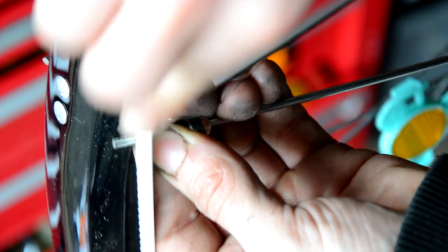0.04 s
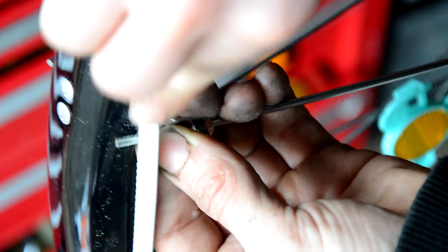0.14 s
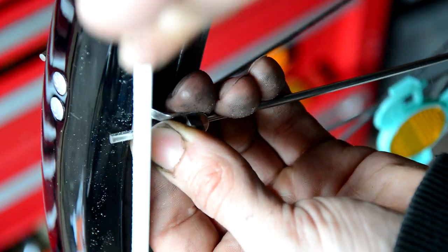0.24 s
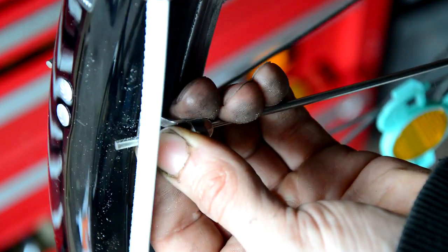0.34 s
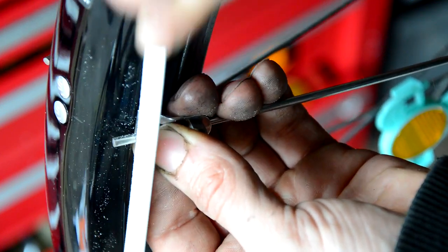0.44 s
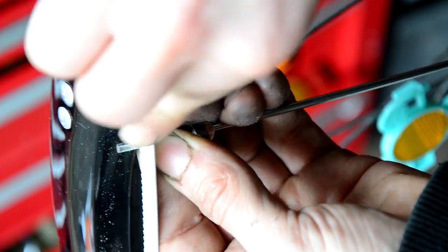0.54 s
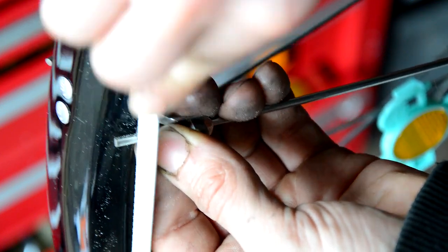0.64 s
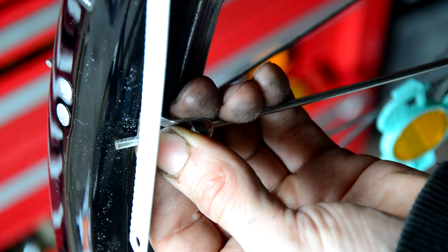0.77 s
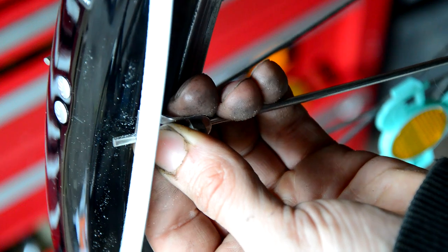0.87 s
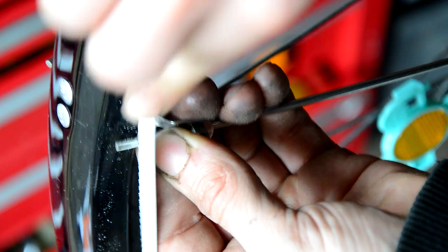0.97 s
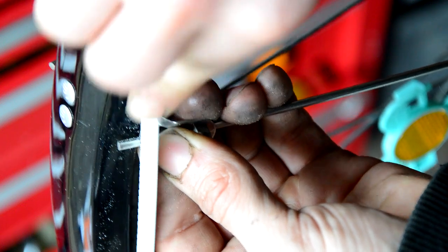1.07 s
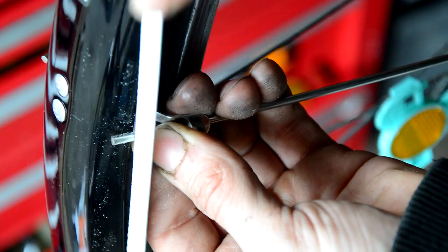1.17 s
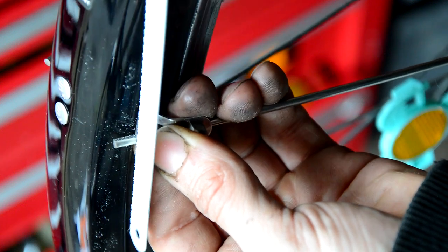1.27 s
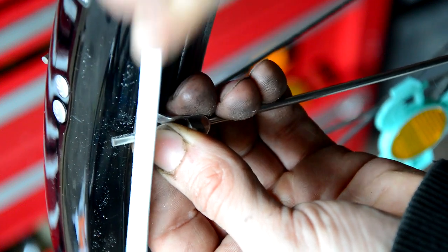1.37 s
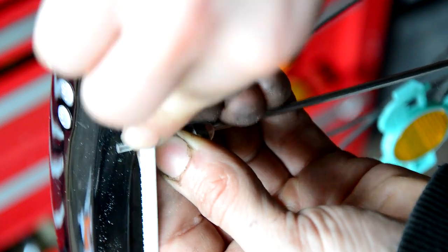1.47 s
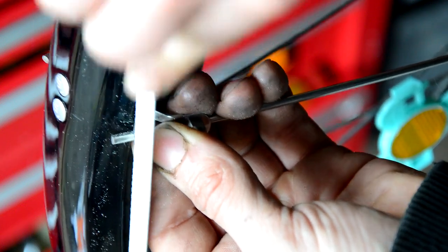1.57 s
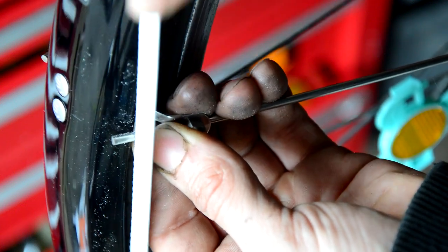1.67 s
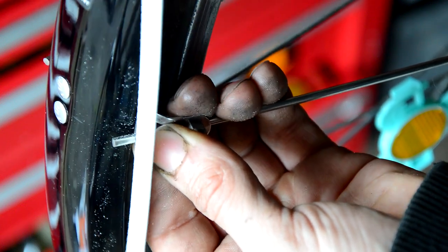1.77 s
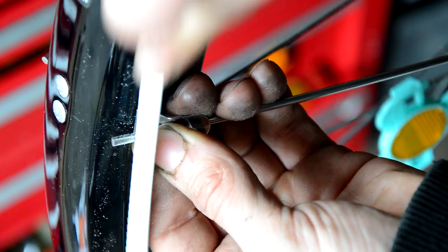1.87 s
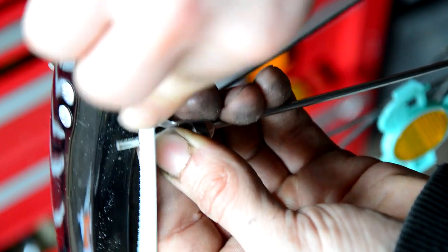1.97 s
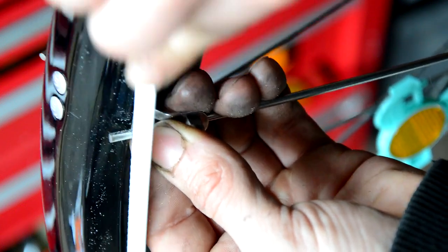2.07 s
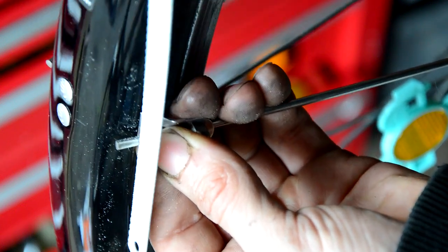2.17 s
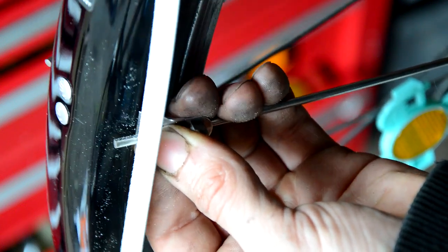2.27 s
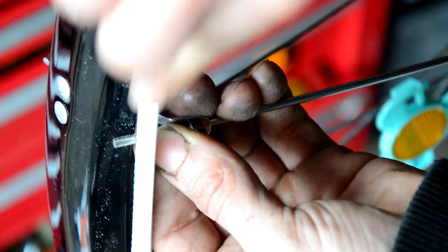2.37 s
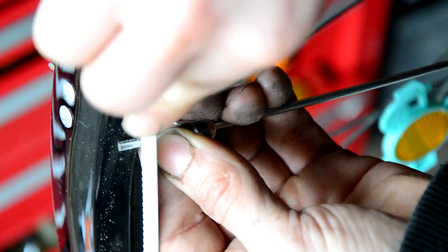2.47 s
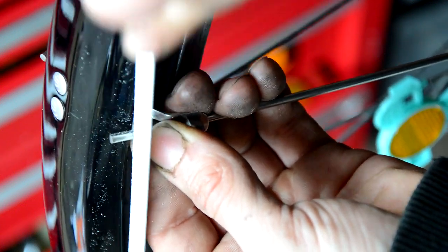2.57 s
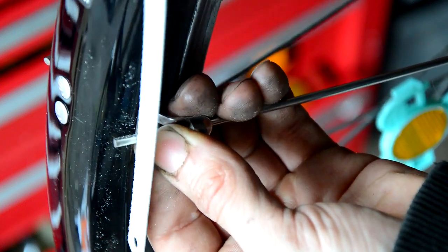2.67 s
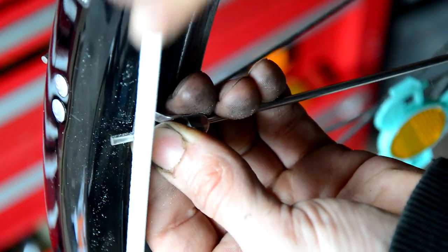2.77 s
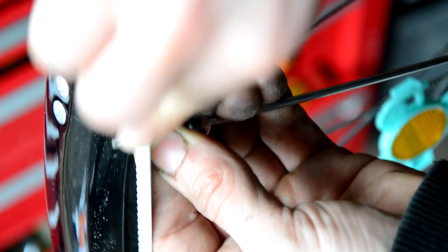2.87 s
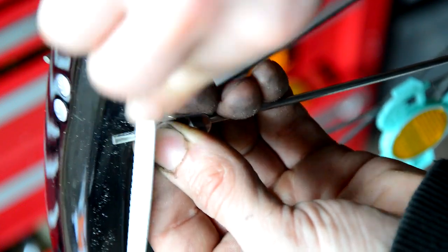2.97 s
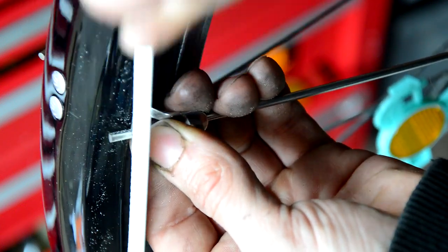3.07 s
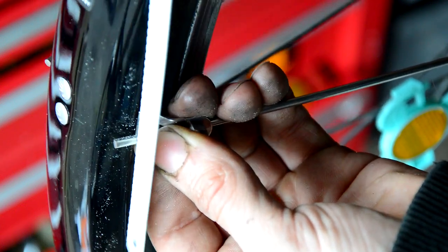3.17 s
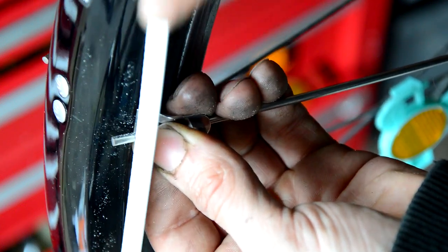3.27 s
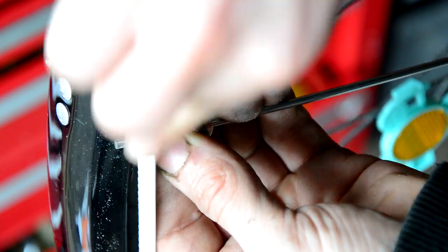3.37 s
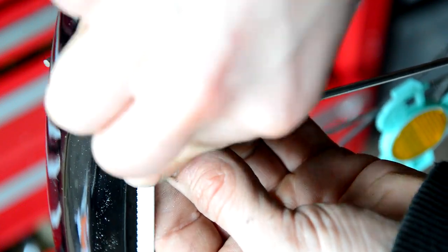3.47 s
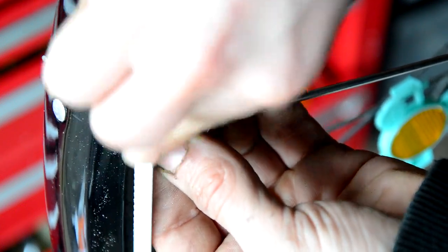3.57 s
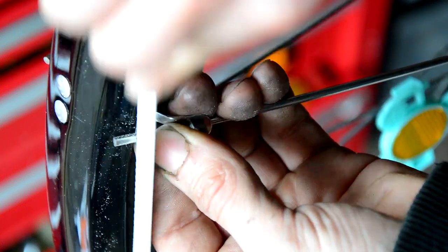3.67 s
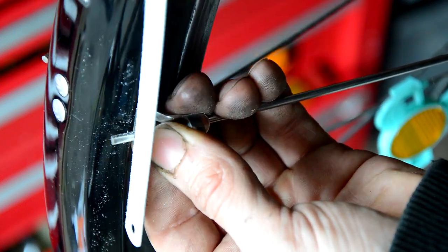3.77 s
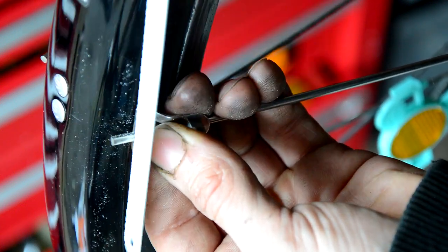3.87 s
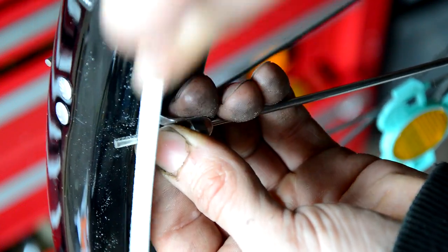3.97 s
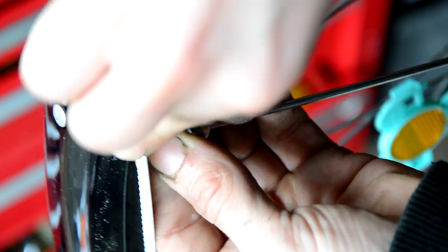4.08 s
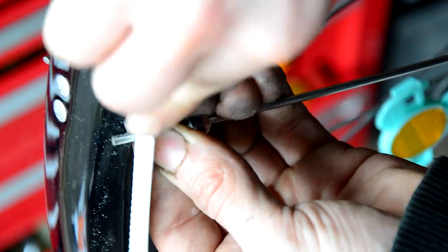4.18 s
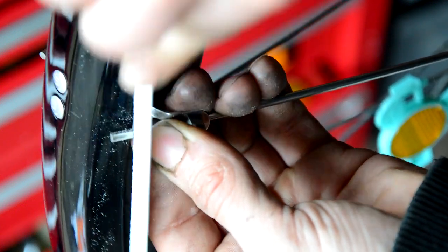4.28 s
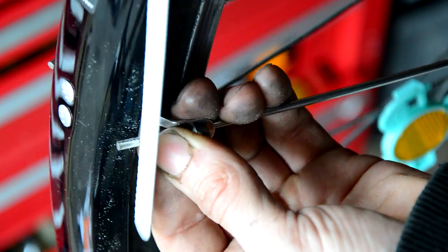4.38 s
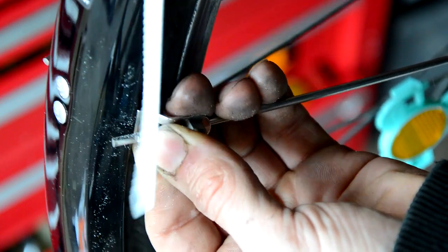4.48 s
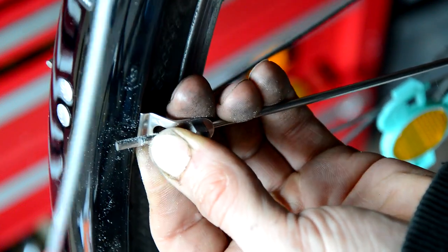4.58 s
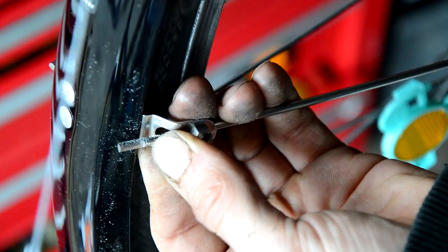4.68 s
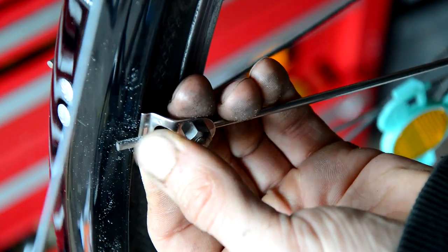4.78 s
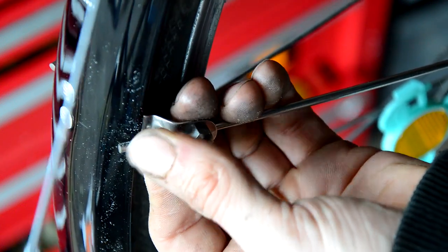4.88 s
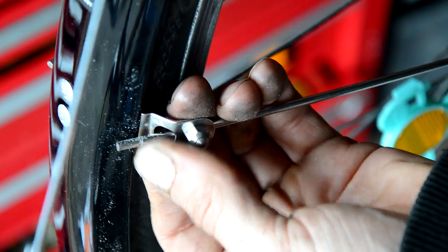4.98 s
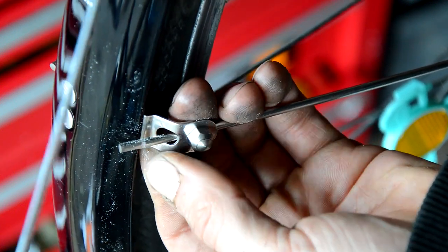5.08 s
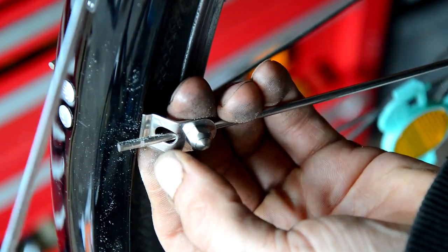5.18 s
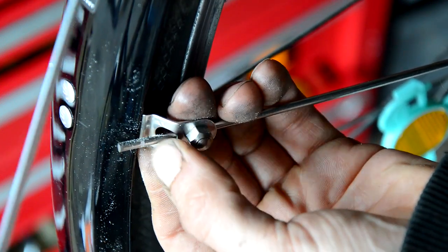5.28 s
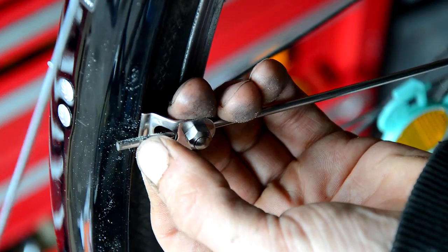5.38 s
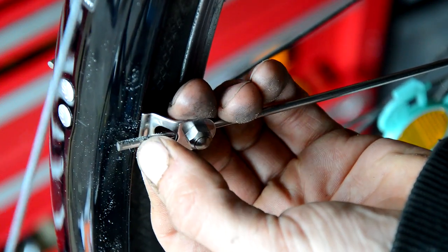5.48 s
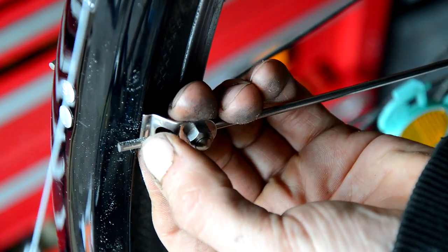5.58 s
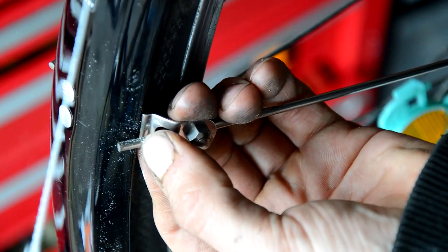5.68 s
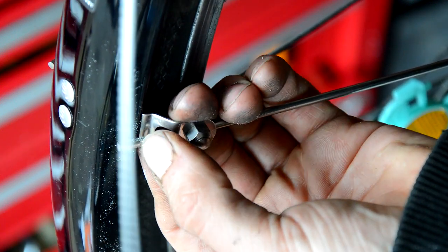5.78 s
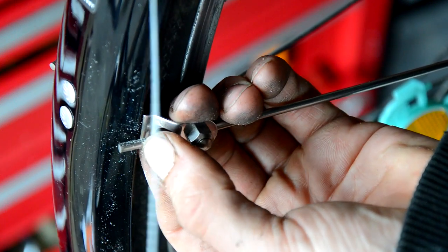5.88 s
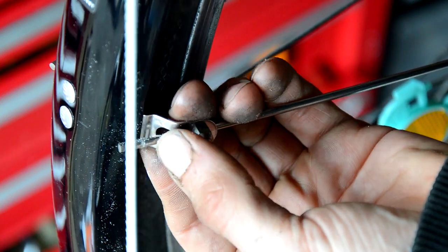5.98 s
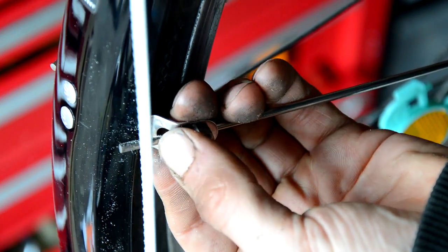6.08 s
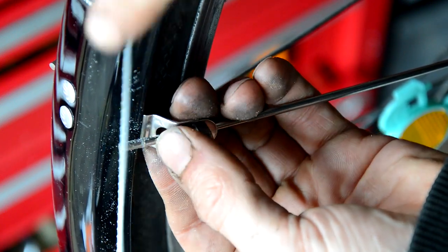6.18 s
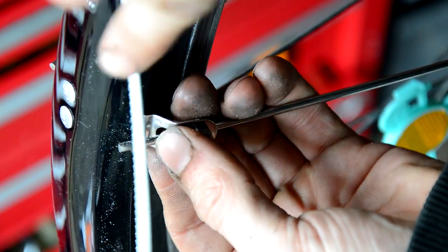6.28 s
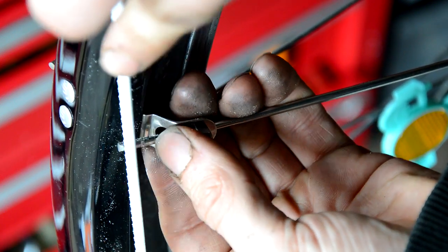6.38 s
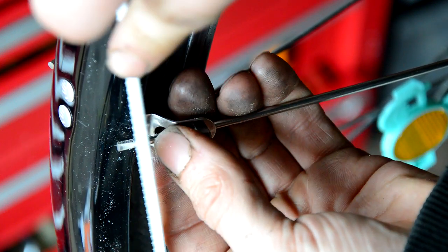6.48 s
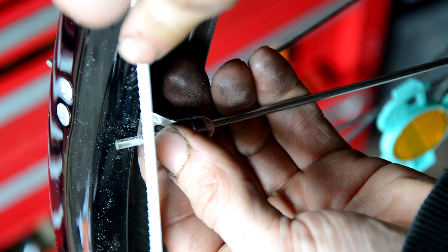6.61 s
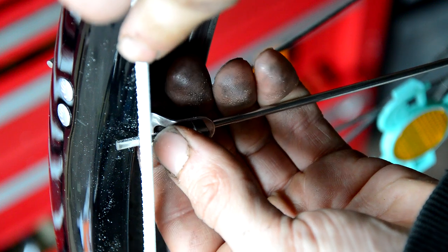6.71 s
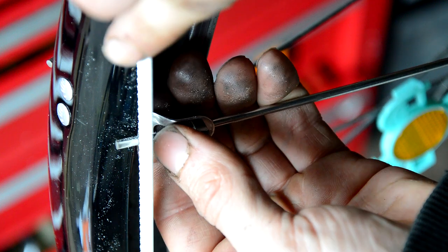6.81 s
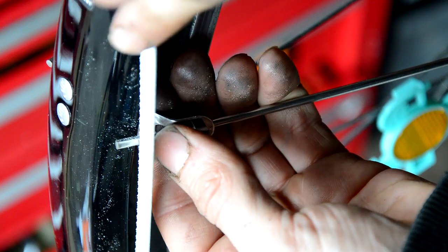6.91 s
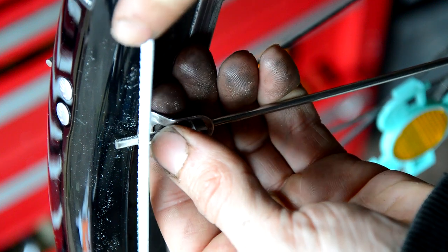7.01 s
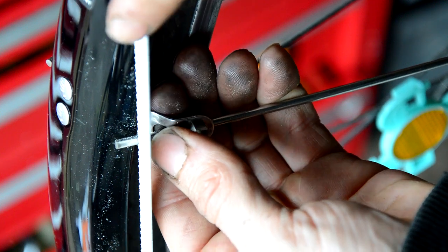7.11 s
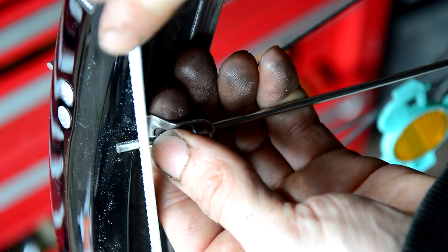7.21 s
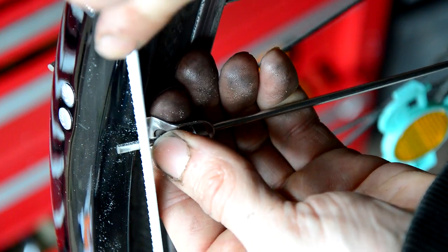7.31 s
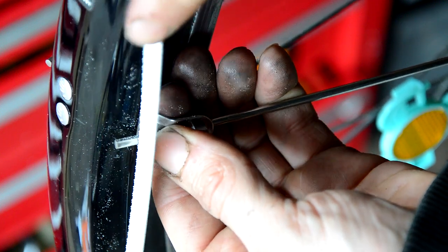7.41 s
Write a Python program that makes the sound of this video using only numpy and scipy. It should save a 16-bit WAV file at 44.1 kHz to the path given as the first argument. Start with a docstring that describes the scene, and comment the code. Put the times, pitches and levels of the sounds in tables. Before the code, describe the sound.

A hand hacksaw rasps through a thin steel rod in quick even strokes, stops, then taps and scrapes lightly on the metal.

```python
"""A small garage, one microphone close to a bicycle: a hand hacksaw cuts a steel mudguard stay,
about two strokes a second each way. Teeth tear chips and ring the stay and saw frame; the blade's
free length whistles in glides as it shortens and lengthens. After a pause the blade is set back on
the rod with light ticks and scrapes. Beyond the walls a motor vehicle drones past, then far traffic."""
import sys
import numpy as np
from scipy import signal
from scipy.fft import rfft, irfft, next_fast_len
from scipy.io import wavfile
from scipy.ndimage import map_coordinates

SR = 44100
rng = np.random.default_rng(int(sys.argv[2]) if len(sys.argv) > 2 else 0)


def bounce(signal):
    """Save signal as a 16-bit WAV file at the path given by the first command-line argument."""
    frames = np.transpose(np.atleast_2d(signal))
    limited = np.clip(frames, -1, 1)
    pcm = np.round(limited * 32767).astype(np.int16)
    wavfile.write(sys.argv[1], SR, pcm)


N = 328545

# pull and push in turn: (start [s], length [s], fastest point [0-1], level [dB], first bite [dB re level])
STROKES = [(-0.04, 0.17, 0.51, -23, -1), (.179, 0.21, .49, -22, -9.5), (0.401, .2, 0.43, -22.5, -6.5),
           (0.643, .24, 0.4, -22.5, -8.5), (.886, 0.21, 0.36, -21.5, -7), (1.115, 0.22, 0.3, -21.5, -10.5),
           (1.335, .22, 0.51, -22.5, -6), (1.574, .22, 0.4, -22.5, -9), (1.802, 0.2, 0.46, -24, -8),
           (2.059, 0.22, 0.42, -23, -9), (2.288, 0.25, 0.37, -23, -5), (2.552, .2, 0.47, -21.5, -6.5),
           (2.756, .225, .47, -19.5, -11), (2.999, 0.23, 0.45, -21.5, -11), (3.24, 0.31, 0.55, -26.5, -1.5),
           (3.61, 0.26, 0.43, -22, -11.5), (3.909, .212, .68, -22.5, -7), (4.21, .33, .43, -21.5, -19)]
# resonances of stay, wheel and saw frame:
# (frequency [Hz], width [Hz], height deep in the cut [dB], height under a light touch [dB])
STEEL_MODES = [(248, 18, 20, 14.5), (294.6, 34, 18, 11), (508.5, 26, 10, 18), (671, 26, 13, 11),
               (749, 11.3, 14.5, 13), (815, 80, 13, 14.5), (1117, 27, 20.5, 8), (1183, 50, 20, 19.5),
               (1326, 28, 12.5, 14), (1550, 112, 14, 17.5), (1640, 160, 13, 6), (1946, 41, 16.5, 11),
               (2077, 50, 13.5, 11.5), (2606, 99, 14.5, 17.5), (2746, 40, 20.5, 12.5), (3087, 71, 19.5, 21),
               (3228, 45, 22, 15), (3326, 55, 22, 22.5), (3750, 69, 15, 3), (3964, 100, 12, 13),
               (4340, 47, 14.5, 24), (4850, 260, 8, 11.5), (5288, 130, 10, 18.5), (6076, 65, 8.5, 18.5),
               (6410, 200, 3.5, 9), (7160, 220, 9, 17), (7850, 52, -13, -3), (8900, 320, 3.5, 7.5),
               (9900, 360, 2.5, 11.5), (11300, 250, -1, 8)]
# colour of the cutting between the resonances: (frequency [Hz], level [dB])
CUT_COLOUR = [(30, -59), (110, -12), (170, -13), (230, -12), (420, -6.5), (720, -2.5), (1400, -4.5),
              (2300, -3.5), (3500, -5.5), (5000, -3), (8000, -3), (11500, -10), (13500, -23), (15500, -26)]
# colour of the blade's whistle: (frequency [Hz], level [dB])
WHISTLE_COLOUR = [(5000, -25), (8000, -2), (11700, 1), (13000, -10), (15000, -21), (17000, -58)]
# late in the cut the teeth bite in step: (time [s], half length [s], level [dB re grind], scatter [0-1])
GROWLS = [(3.44, .07, -6, .14), (3.665, .02, -8, .04), (3.73, .027, -1.5, .02), (4.04, .04, -8.5, .03)]
# decay of the garage walls: (frequency [Hz], t60 [s])
WALL_DECAY = [(200, 0.44), (2000, 0.17), (12000, 0.095)]
# background in the garage: (frequency [Hz], level [dB])
WASH_COLOUR = [(15, -50), (27, -21), (40, -1.5), (52, -8), (66, -3.5), (88, -8), (118, -7), (150, -11.5),
               (290, -9.5), (440, -13), (900, -6), (1600, -14.5), (3100, -23), (15500, -32)]
# a tooth catches hard and tears free: (time [s], relative level [dB], t60 [s])
SNAGS = [(.404, -23, 0.015), (1.044, -13, 0.022), (1.335, -23, 0.015), (1.938, -11, .03), (2.16, -16, .05),
         (2.352, -18, .025), (2.415, -7.5, 0.019), (2.554, -24, 0.019), (2.756, -21, .016),
         (2.783, -11.5, 0.038), (3.243, -11.5, .016), (3.3, -15.5, .08), (3.331, -12, .11),
         (3.442, -12.5, 0.13), (3.911, -17, 0.012), (4.076, -15, .03), (4.121, -7, 0.016),
         (4.209, -21.5, 0.013), (4.261, -25, .04), (4.311, -3.5, .022), (4.333, -9.5, .04),
         (4.437, -14, 0.047), (4.472, -15.5, .11)]
# the vehicle outside: (time [s], firing rate [Hz], relative level [dB])
VEHICLE = [(.7, 48, -76), (.95, 50.6, -54), (1.22, 68.8, -43.5), (1.35, 72.9, -50), (1.5, 68.5, -44.5),
           (1.8, 66.6, -49.5), (2.85, 66.42, -51.5), (3.45, 74.8, -53), (4.2, 72, -65)]
# the garage booms on the engine's second order: (frequency [Hz], level [dB re first order])
GARAGE_BOOM = [(100, 1), (135, 2.5), (146, -5)]
# the blade sticks and sings: (time [s], half length [s], pitch [Hz], level [dB])
SQUEALS = [(1.623, 0.02, 3320, -24.5), (1.791, 0.017, 8253, -45)]
# drone of far traffic: (time [s], pitch [Hz], relative level [dB])
FAR_DRONE = [(4.6, 115.1, -61), (5.7, 118.2, -57), (6.2, 117, -60), (6.6, 105, -52), (7.0, 105.1, -63),
             (7.4, 107, -49.5)]
# the blade taps the rod as it seeks the cut: (time [s], relative level [dB])
TAPS = [(5.956, -35), (6.429, -21), (6.556, -27), (6.581, -28), (6.693, -27), (6.719, -20.5),
        (6.821, -27.5), (6.865, -18.5), (6.894, -19), (6.995, -25), (7.009, -20.5), (7.055, -28),
        (7.109, -20), (7.119, -16.5)]
# colour of a tap: (frequency [Hz], level [dB])
TAP_COLOUR = [(40, -45), (250, 2.5), (550, 2.5), (1150, -1.5), (1600, 0), (2700, 0), (3400, 4.5),
              (4500, -1), (7000, -1.5), (10500, -7), (13000, -17), (16000, -22)]
# the blade slides lightly between taps: (start [s], length [s], level [dB])
SLIDES = [(6.474, 0.019, -43.5), (6.551, 0.15, -48), (6.697, 0.021, -37), (6.877, 0.049, -44.5),
          (6.99, 0.16, -46)]

TOP_HZ = 15850
LIFT_OFF_S = 4.56  # the saw leaves the rod


def amp(db):
    """Decibels to gain."""
    return 10 ** (np.asarray(db) / 20)


def unit(x):
    """Scaled to rms 1."""
    return x / np.sqrt(np.mean(x ** 2) + 1e-20)


def along(points, hz):
    """(frequency, value) points read on a log axis."""
    f, v = np.transpose(points)
    return np.interp(np.log(hz + 1), np.log(f + 1), v)


def curves(rows):
    """One value per sample for each column after the time."""
    times, *columns = np.transpose(rows)
    return [np.interp(np.arange(N) / SR, times, column) for column in columns]


def wobble(rate):
    """A smooth random curve, rate knots a second."""
    knots = rng.standard_normal(int(N * rate / SR) + 4)
    grid = np.linspace(0, len(knots) - 1, 10 * len(knots))
    return np.interp(np.arange(N) * rate / SR, grid, map_coordinates(knots, [grid]))


def swell(s, half):
    """A smooth rise and fall around time s."""
    return np.exp(-((np.arange(N) / SR - s) / half) ** 2 / 2)


def tone(hz):
    """A sine of rms 1 that follows a pitch curve."""
    return np.sqrt(2) * np.sin(2 * np.pi * np.cumsum(hz) / SR)


def filtered(x, response):
    """x times a response of frequency."""
    size = next_fast_len(N + SR // 2)
    return irfft(rfft(x, size) * response(np.fft.rfftfreq(size, 1 / SR)), size)[:N]


def arm(top_cm_per_s=50, full_effort_db=-23, mid_blade_cm=12.0, half_bite_s=0.007):
    """Each stroke grips at once, speeds up and slows to the next turn; loudness follows speed."""
    t = np.arange(N) / SR
    speed, level, grind_offset_db = np.zeros((3, N))
    blade_cm = np.full(N, mid_blade_cm)
    for k, (start, length, fastest, db, bite_db) in enumerate(STROKES):
        direction, lean_db = (-0.9, -4.5) if k % 2 else (0.85, -6)  # the push leans harder on the rod
        now = (t >= start - half_bite_s) & (t < start + length)
        progress = np.clip((t[now] - start) / length, 0, 1)
        pace = np.abs(np.sin(np.interp(progress, [0, fastest, 1], [0, np.pi / 2, np.pi])))
        grip = np.clip((t[now] - start + half_bite_s) / (2 * half_bite_s), 0, 1) * (1 - progress) ** 0.72
        cutting = np.tanh(1.24 * pace ** 2.28) / np.tanh(1.24)  # grows with speed, then levels off
        speed[now] = top_cm_per_s * amp(min(db - full_effort_db, 0)) * pace
        travel = np.cumsum(speed[now]) / SR
        blade_cm[now] = mid_blade_cm + direction * (travel - travel[-1] / 2)
        level[now] += amp(db) * np.hypot(cutting, amp(bite_db) * grip)
        grind_offset_db[now] = lean_db - 3 * (k == len(STROKES) - 1)  # thinner with little rod left
    rasp_db = 20 * np.log10(level + amp(-54))
    grind_db = rasp_db + grind_offset_db - 0.14 * (rasp_db + 27)
    return speed, blade_cm, rasp_db, grind_db


def chips(tooth_hz, scatter_db, bite, rub_db):
    """Each tooth tears a chip of its own size: a burst fading over bite tooth spacings, plus rubbing."""
    teeth = np.cumsum(np.abs(tooth_hz * (1 + 0.12 * wobble(200)))) / SR
    size = amp(scatter_db * np.clip(rng.standard_normal(N), -2, 2))[teeth.astype(int)]
    bursts = unit(size * np.exp(-(teeth % 1) / bite))
    return unit((bursts + amp(rub_db)) * rng.standard_normal(N))


def steel_ring(force, colour, band=lambda hz: 1, light_touch=False, vary_db=2.1, detune=0.0033):
    """A force rings the steel; grip and contact point shift, so the resonances vary slightly."""
    size, step = 8192, 4096
    hz = np.fft.rfftfreq(size, 1 / SR)
    centre, width, deep_db, light_db = np.transpose(STEEL_MODES)[:, :, None]
    mode_db = light_db if light_touch else deep_db
    base = amp(along(colour, hz)) * band(hz)
    out = np.zeros(N + 2 * size)
    for start in range(0, N, step):
        shift, change = rng.standard_normal((2, len(STEEL_MODES), 1))
        piece = force[start:start + step]
        if not piece.any():
            continue
        heights = amp(mode_db + vary_db * change) ** 2
        off_centre = (hz - centre * (1 + detune * shift)) / (width / 2)
        gain = base * np.sqrt(1 + np.sum(heights / (1 + off_centre ** 2), axis=0))
        cepstrum = 2 * irfft(np.log(gain + 1e-6))[:step]  # one-sided: it rings after the blow
        response = irfft(np.exp(rfft(cepstrum, size)))[:step]
        response /= np.linalg.norm(response)
        out[start:][:len(piece) + step - 1] += signal.fftconvolve(piece, response)
    return out[:N]


def growl(tooth_hz, grind_db):
    """Teeth biting in step growl at their passing rate, fading as the stroke slows."""
    in_step = sum(amp(db) * swell(s, half) * tone(tooth_hz * (1 + scatter * wobble(160)))
                  for s, half, db, scatter in GROWLS)
    return in_step * amp(grind_db + 1.48 * wobble(56)) * np.clip(tooth_hz / 250, 0, 1) ** 4


def whistle(length_cm, stiffness_hz_cm2=13000):
    """Bending modes of the free blade: pitch goes as (mode number / length) squared."""
    out = np.zeros(N)
    for mode in range(1, 19):
        hz = stiffness_hz_cm2 * (mode / length_cm) ** 2
        flicker = amp(3.5 * wobble(45)) * wobble(800)
        out += amp(along(WHISTLE_COLOUR, hz)) * (hz < TOP_HZ) * flicker * tone(hz)
    return out


def sawing(speed, blade_cm, rasp_db, grind_db, teeth_per_cm=10, split_hz=1900):
    """Passing teeth make a high rasp and a low grind; harder strokes are brighter and whistle more."""
    tooth_hz = teeth_per_cm * speed + 25
    pressure = amp(0.76 * wobble(60)) * (np.arange(N) / SR < LIFT_OFF_S)
    force = pressure * chips(tooth_hz, scatter_db=3, bite=0.39, rub_db=-3.5)
    low = lambda hz: 1 / np.sqrt(1 + (hz / split_hz) ** 12)
    high = lambda hz: np.sqrt(1 - low(hz) ** 2)
    bright_db = np.clip(0.57 * (rasp_db + 22.5), -9, 1.5)
    treble = filtered(force, lambda hz: hz ** 4 / (hz ** 4 + 5500 ** 4)) * (pressure > 0)
    treble_gain = amp(bright_db + 0.55 * wobble(50) + 2.7 * wobble(220))
    sharp_force = force + treble * (treble_gain - 1)
    rasp = steel_ring(amp(rasp_db - 0.78) * sharp_force, CUT_COLOUR, high)
    grind = steel_ring(amp(grind_db - 0.18) * force, CUT_COLOUR, low)
    tones = growl(tooth_hz, grind_db) + amp(rasp_db + bright_db - 20) * whistle(blade_cm)
    return rasp + grind + pressure * tones


def garage(x, hop_s=0.5):
    """The walls' short echo at the microphone, its fine texture drifting slowly."""
    out, t = np.zeros(N), np.arange(N) / SR
    for centre in np.arange(0, N / SR + hop_s, hop_s):
        hz, age, noise = signal.stft(rng.standard_normal(SR // 3), SR, nperseg=256)
        decay = amp(-60 * age / along(WALL_DECAY, hz)[:, None])
        tail = signal.istft(noise * decay, SR, nperseg=256)[1]
        tail = np.pad(tail, (SR // 300, 0))  # arrives just after the direct sound
        crossfade = np.sqrt(np.clip(1 - np.abs(t - centre) / hop_s, 0, 1))
        out += signal.oaconvolve(x * crossfade, tail / np.linalg.norm(tail))[:N]
    return out


def traffic_wash(level_db=-49):
    """A soft, low wash of traffic fills the garage throughout."""
    wash = unit(filtered(rng.standard_normal(N), lambda hz: amp(along(WASH_COLOUR, hz))))
    return amp(level_db + 0.78 * wobble(11)) * wash


def blows(rows, rise_share, chatter_t60, chatter_db):
    """Force of (time [s], level [dB], t60 [s]) contacts: a snap, then the blade chatters briefly."""
    force, t = np.zeros(N + SR), np.arange(SR // 6) / SR
    for s, db, t60 in rows:
        rise = 1 - np.exp(-t / (rise_share * t60))
        fall = amp(-60 * t / t60) + amp(chatter_db - 60 * t / chatter_t60)
        force[round(s * SR):][:len(t)] += amp(db - 4.5) * rise * fall * rng.standard_normal(len(t))
    return force[:N]


def snagging(rasp_db, thin_hz=900, sheen_hz=14900, stray_t60=0.016, stray_count=36):
    """Teeth catch lightly at random and now and then hard; deep in the cut it sounds thin and bright."""
    strays = [(s, rasp_db[int(s * SR)] + 4 + 2.5 * rng.standard_normal(), stray_t60)
              for s in LIFT_OFF_S * rng.random(stray_count)]
    force = blows(list(SNAGS) + strays, rise_share=0.051, chatter_t60=0.12, chatter_db=-16)
    return steel_ring(force, CUT_COLOUR, lambda hz: hz / (hz + thin_hz) * (1 + (hz / sheen_hz) ** 4))


def vehicle():
    """An engine passes outside; only its two lowest orders come through the walls."""
    t = np.arange(N) / SR
    passing = (t >= VEHICLE[0][0]) & (t <= VEHICLE[-1][0])
    hz, db = curves(VEHICLE)
    hz *= 1 + 0.009 * wobble(14)
    first = amp(1.6 * wobble(11)) * tone(hz)
    second = amp(1.6 * wobble(11) + along(GARAGE_BOOM, 2 * hz)) * tone(2 * hz)
    return amp(db - 2) * (first + second) * passing


def squeals():
    """Now and then stick and slip locks on to one mode."""
    return sum(amp(db) * swell(s, half) * tone(hz * (1 + 0.0031 * wobble(150)))
               for s, half, hz, db in SQUEALS)


def far_traffic():
    """A faint, wavering drone in the distance that comes up after the sawing stops."""
    hz, db = curves(FAR_DRONE)
    return amp(db - 3 + 2.2 * wobble(10)) * tone(hz * (1 + 0.02 * wobble(12)))


def seeking(attack_s=0.011, release_s=0.017, tap_t60=0.021):
    """The blade is set back on the rod: it taps, and single teeth drag slowly over the steel."""
    touch, t = np.zeros(N), np.arange(N) / SR
    for s, length, db in SLIDES:
        rise = np.clip((t - s) / attack_s, 0, 1)
        fall = np.exp(-np.maximum(t - s - length, 0) / release_s)
        touch += amp(db) * rise * fall
    drag = touch * chips(tooth_hz=130, scatter_db=6, bite=0.48, rub_db=-2)
    taps = blows([(s, db, tap_t60) for s, db in TAPS], rise_share=0.041, chatter_t60=0.096, chatter_db=-14)
    return steel_ring(drag + taps, TAP_COLOUR, light_touch=True)


def scene():
    """The saw close to the microphone, the garage around it, the street beyond the walls."""
    speed, blade_cm, rasp_db, grind_db = arm()
    saw = sawing(speed, blade_cm, rasp_db, grind_db) + snagging(rasp_db) + squeals() + seeking()
    return (saw + amp(-9.5) * garage(saw) + vehicle() + far_traffic() + traffic_wash())[None]


def record(dry):
    """One microphone, mono, with nothing above its band limit."""
    return filtered(dry[0], lambda hz: hz < TOP_HZ)[None]


dry = scene()
out = record(dry)
bounce(out)
```